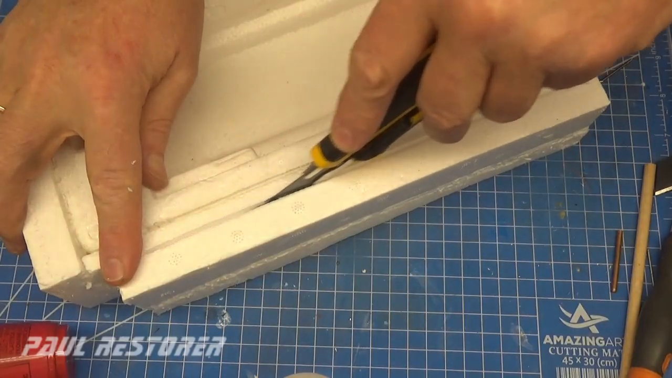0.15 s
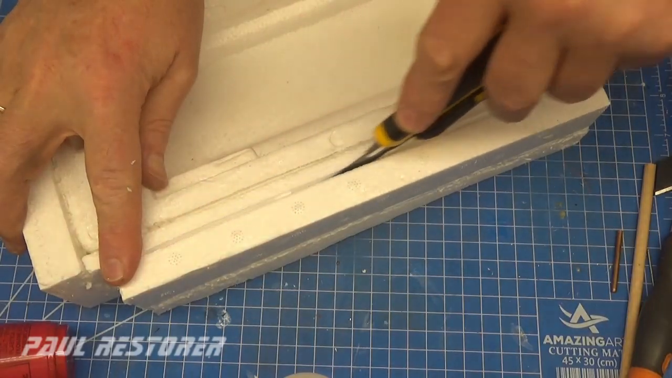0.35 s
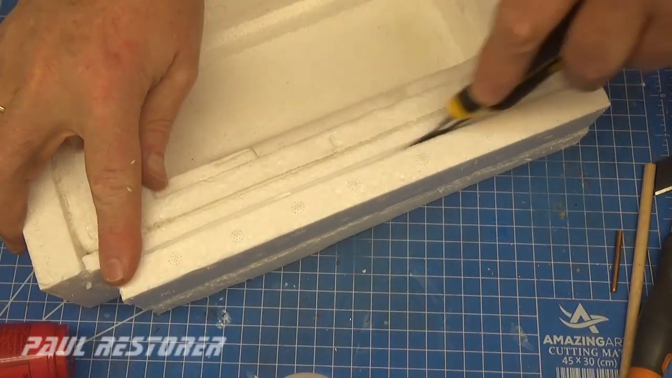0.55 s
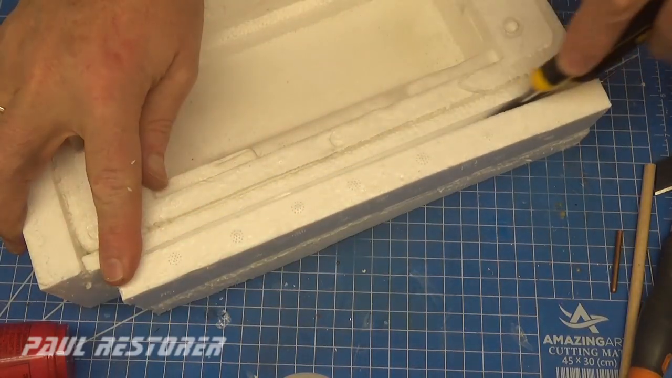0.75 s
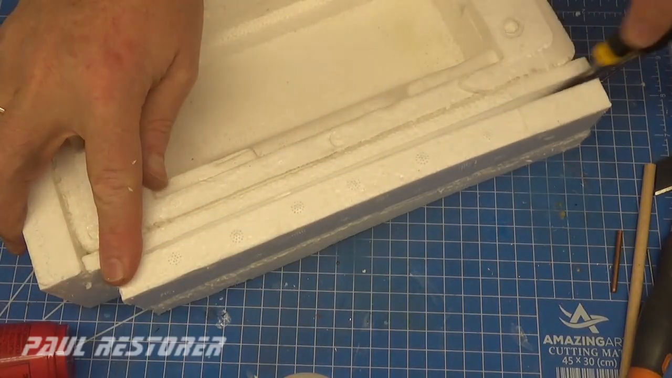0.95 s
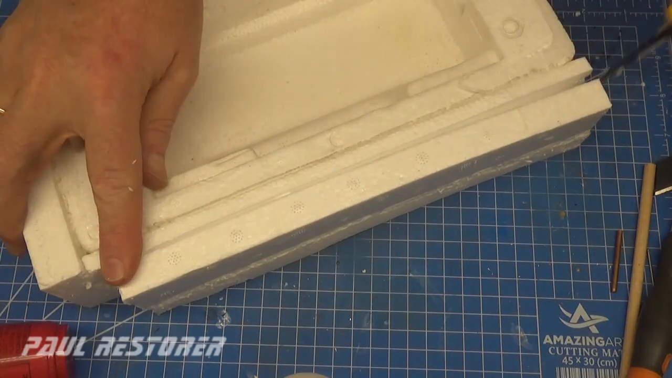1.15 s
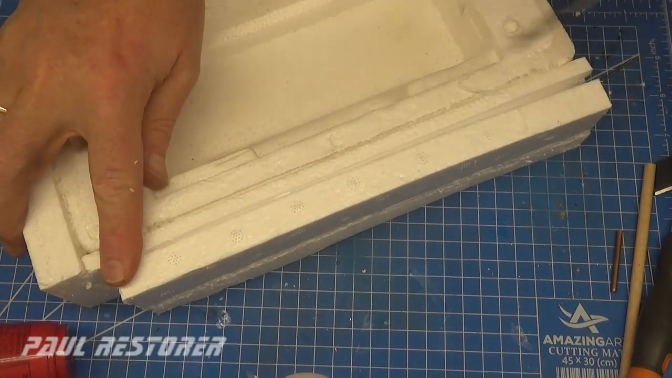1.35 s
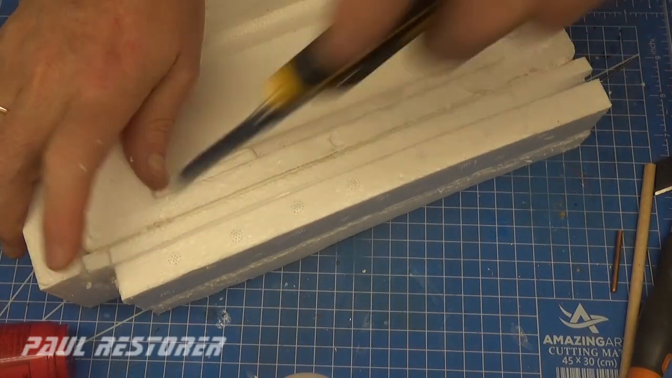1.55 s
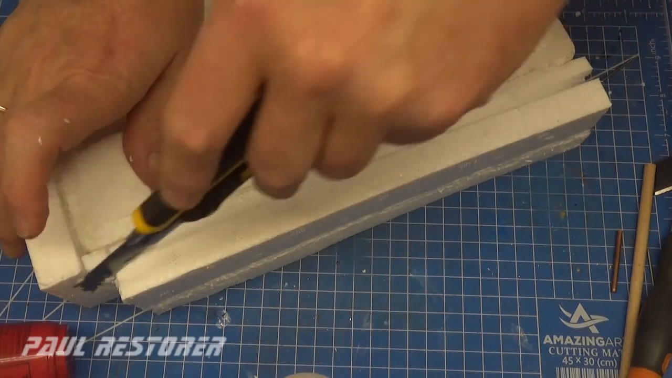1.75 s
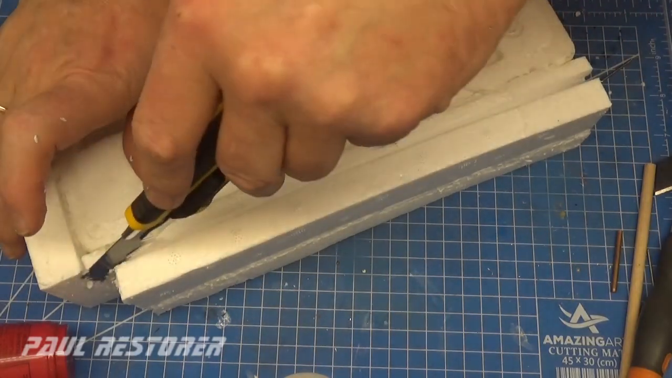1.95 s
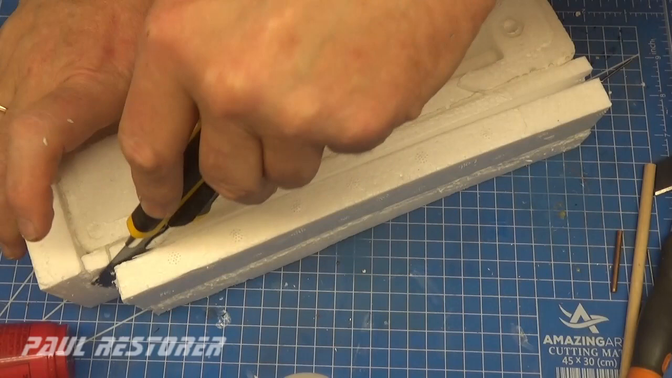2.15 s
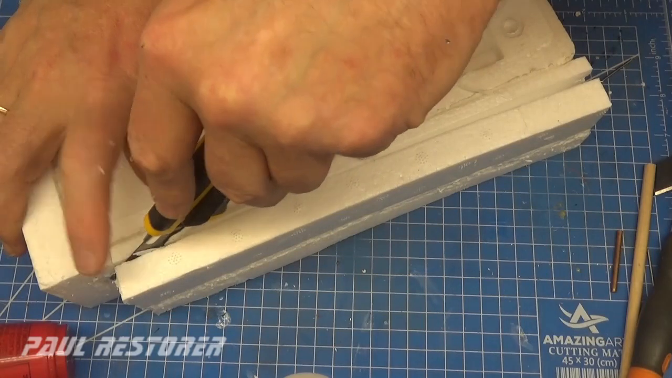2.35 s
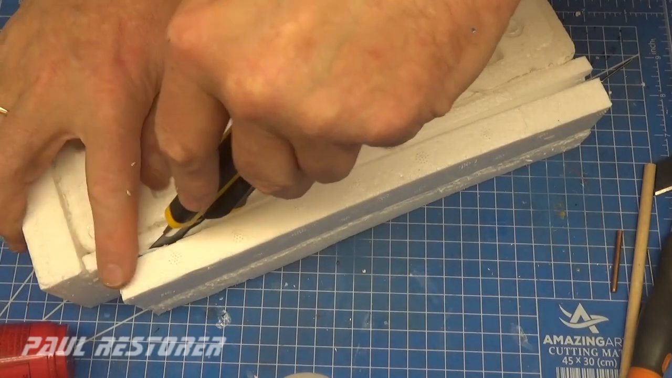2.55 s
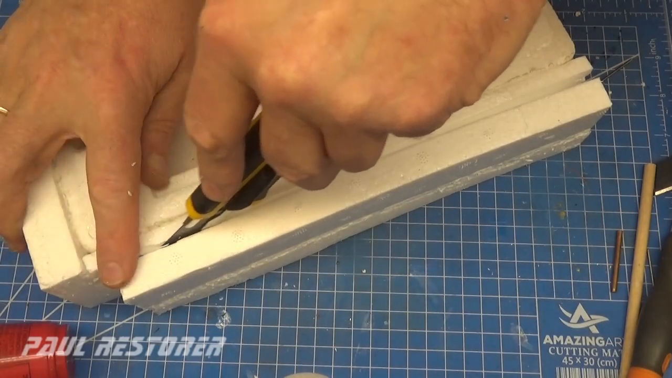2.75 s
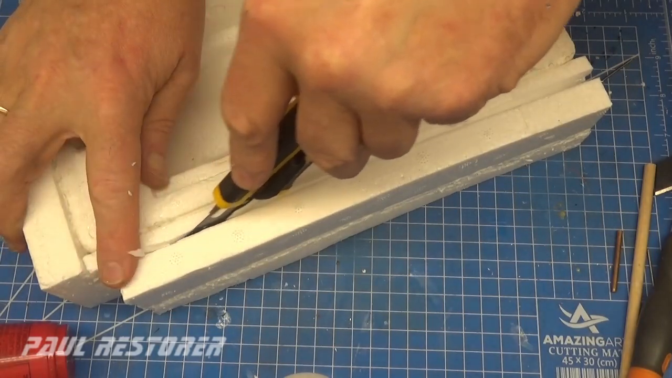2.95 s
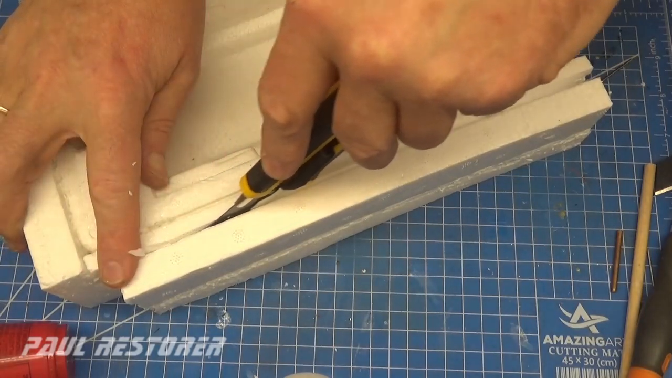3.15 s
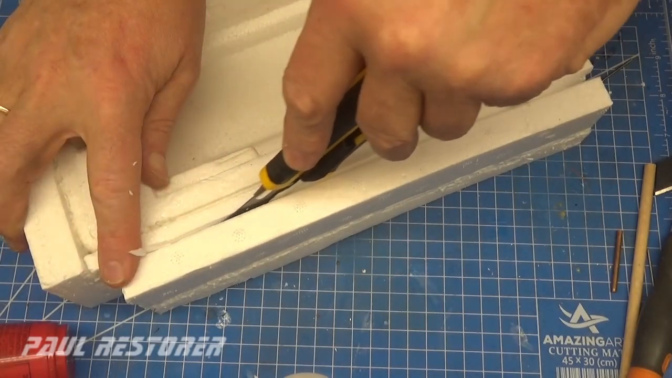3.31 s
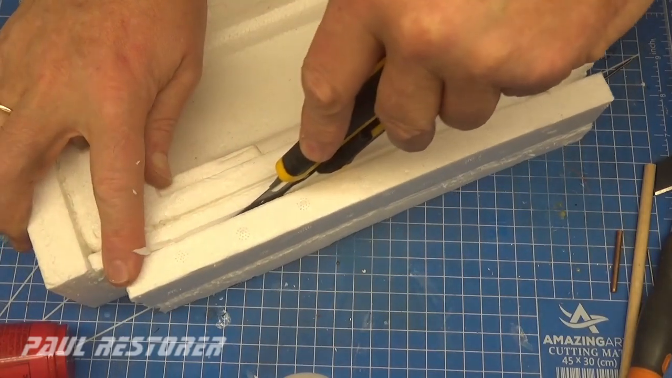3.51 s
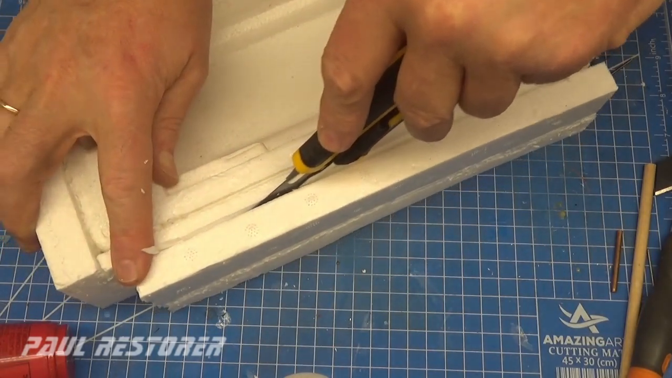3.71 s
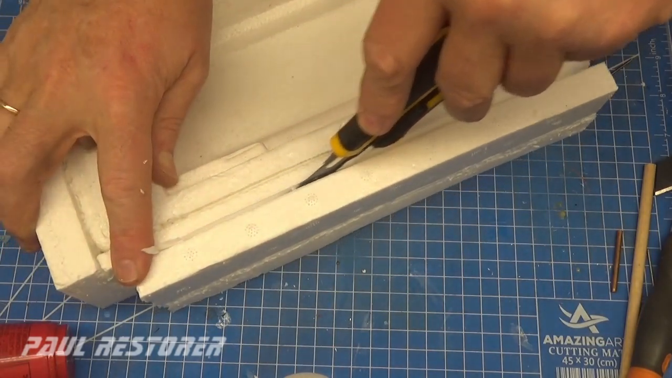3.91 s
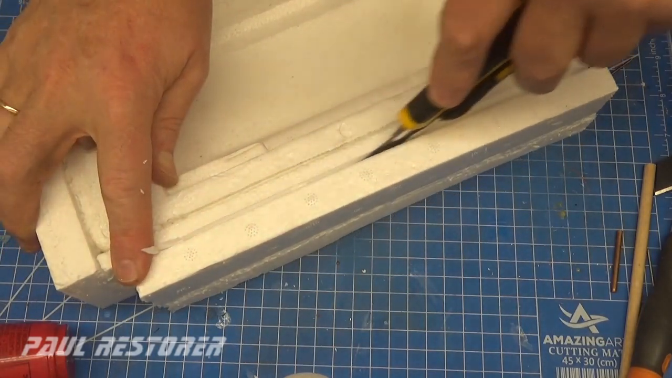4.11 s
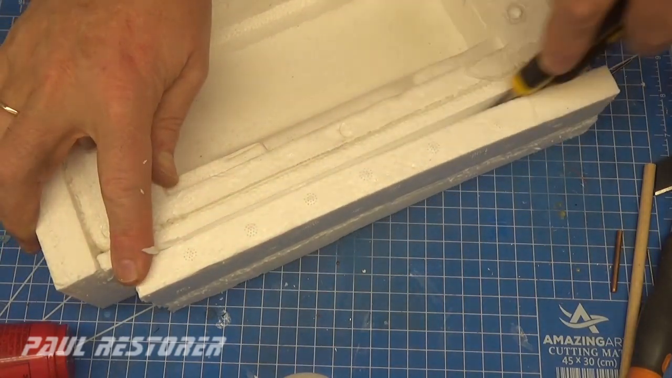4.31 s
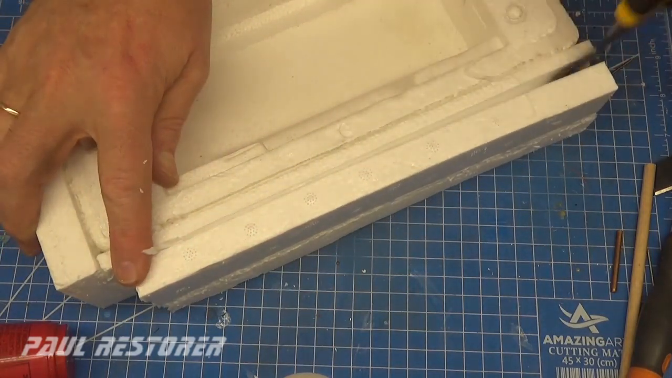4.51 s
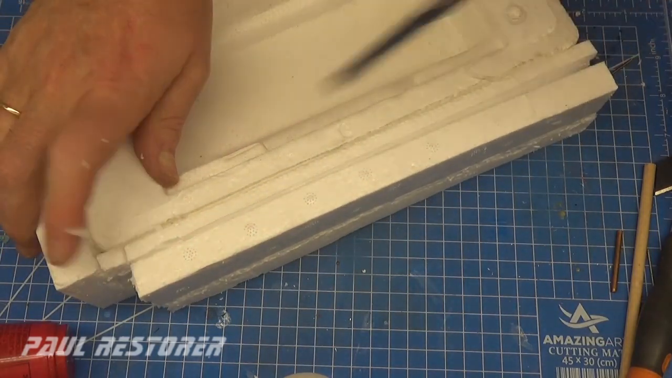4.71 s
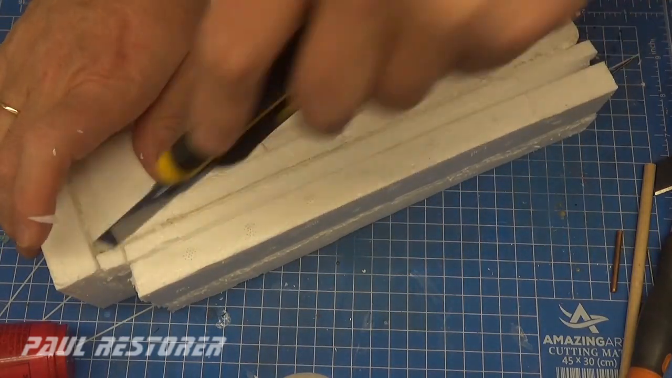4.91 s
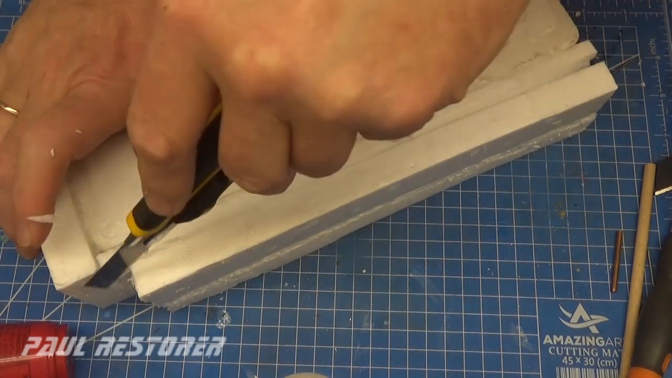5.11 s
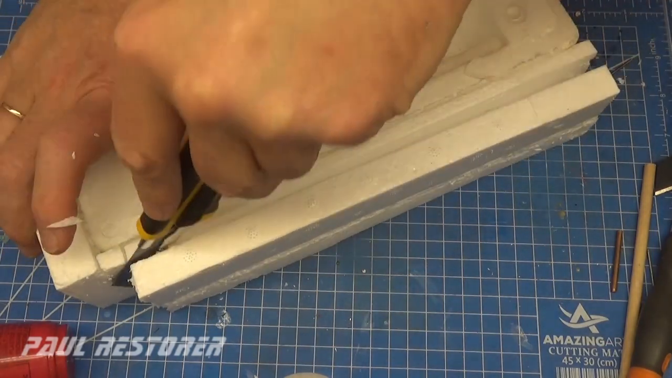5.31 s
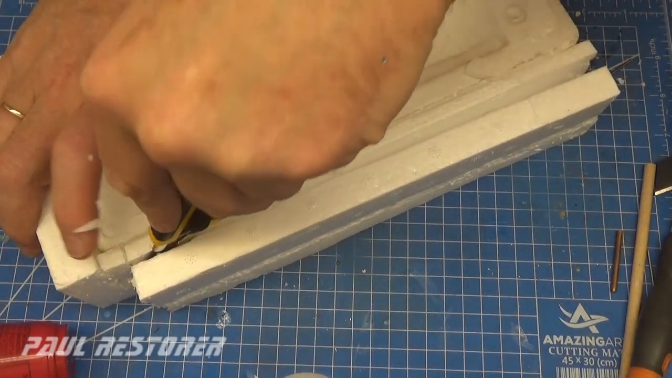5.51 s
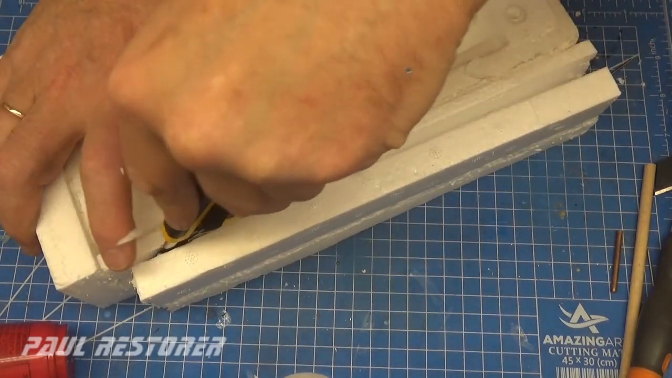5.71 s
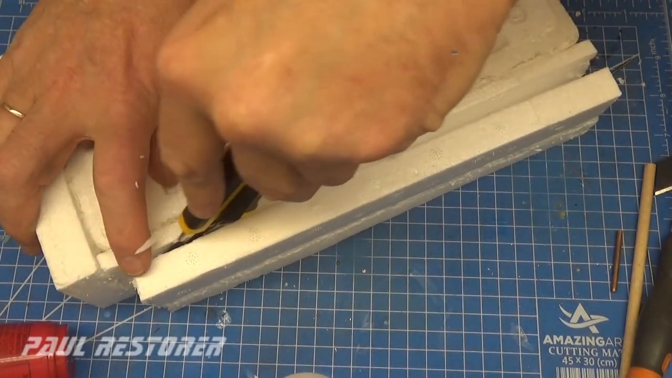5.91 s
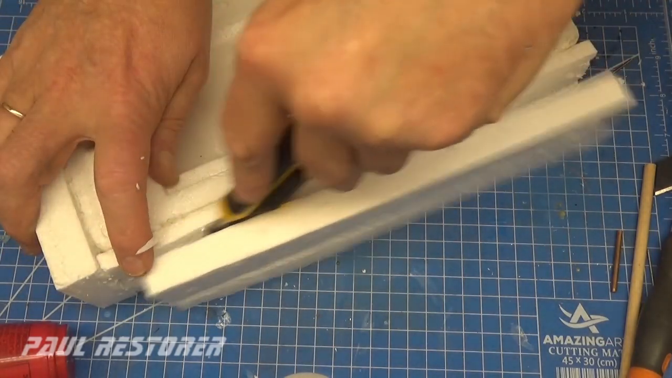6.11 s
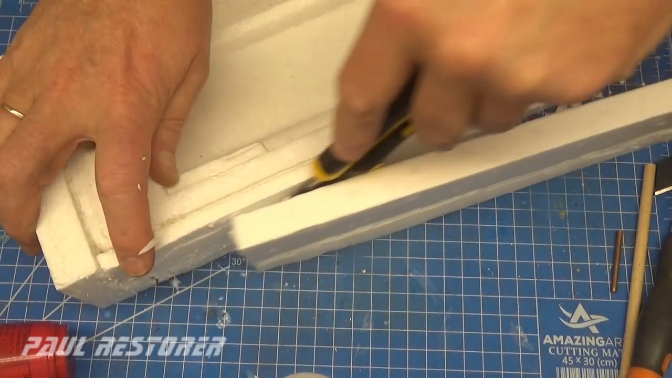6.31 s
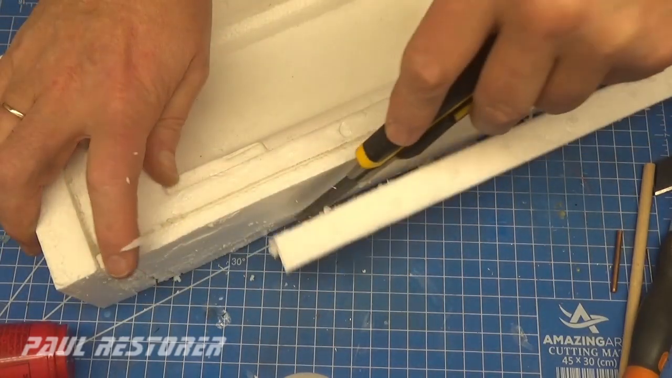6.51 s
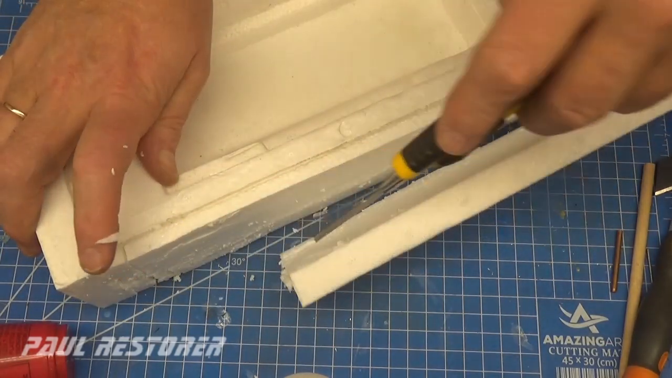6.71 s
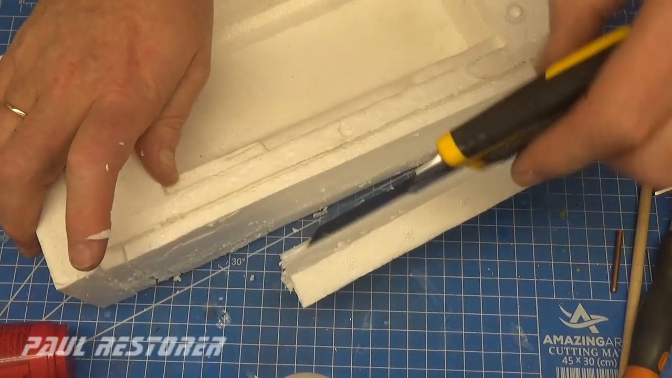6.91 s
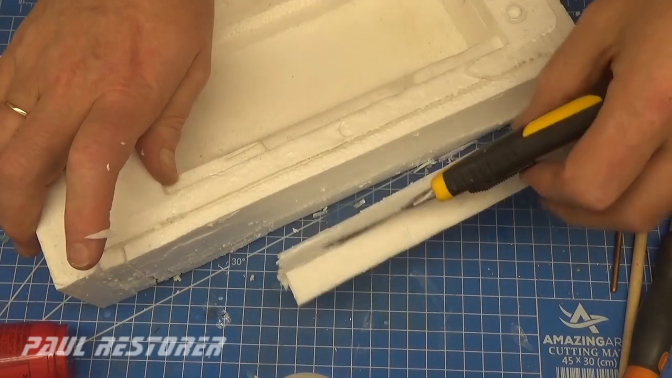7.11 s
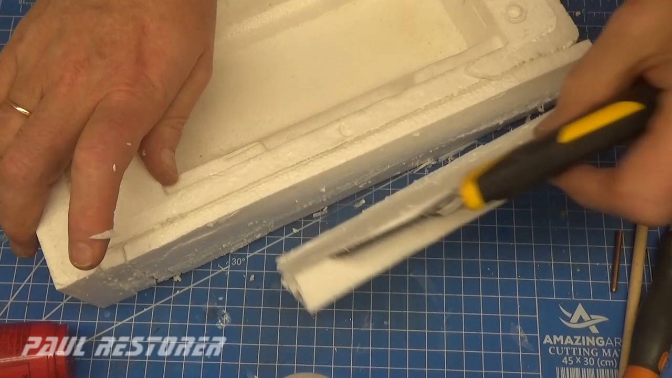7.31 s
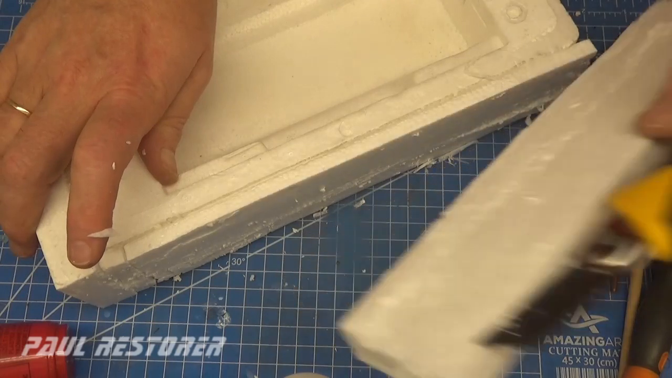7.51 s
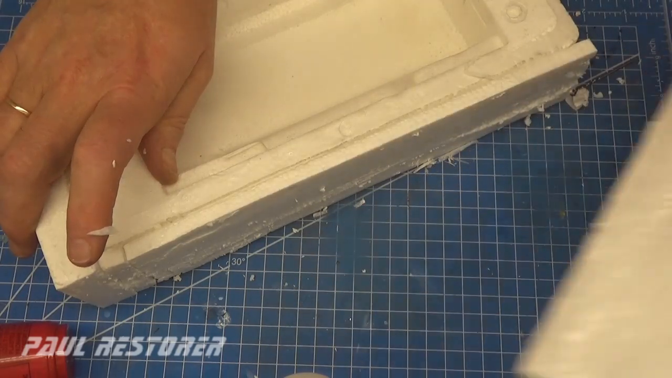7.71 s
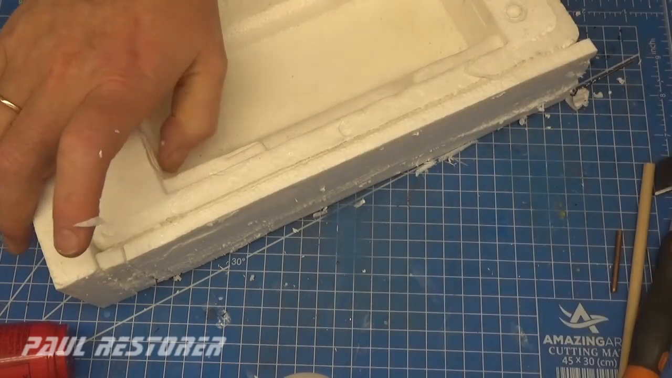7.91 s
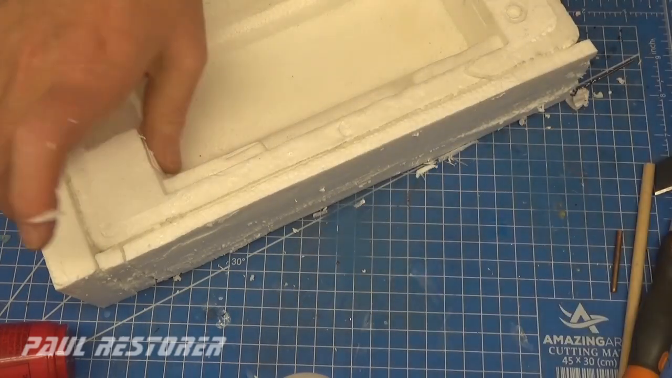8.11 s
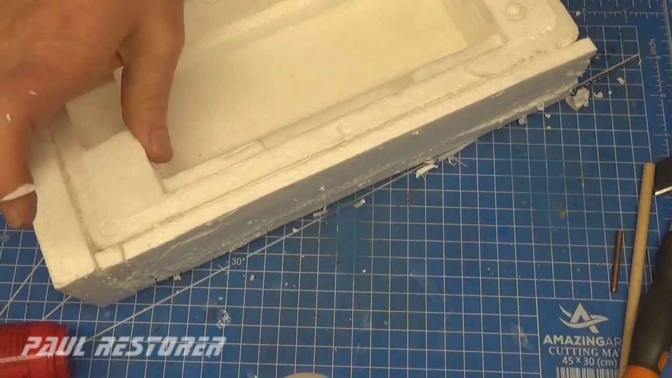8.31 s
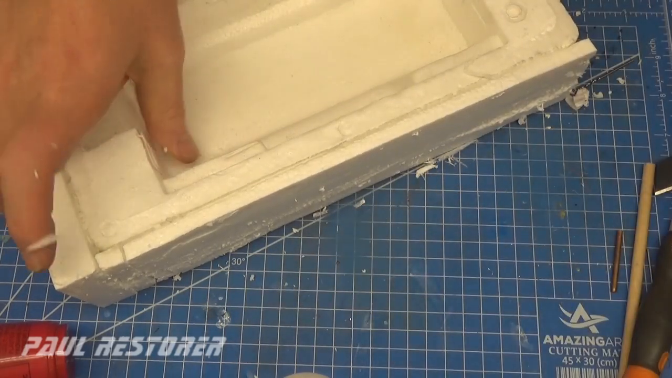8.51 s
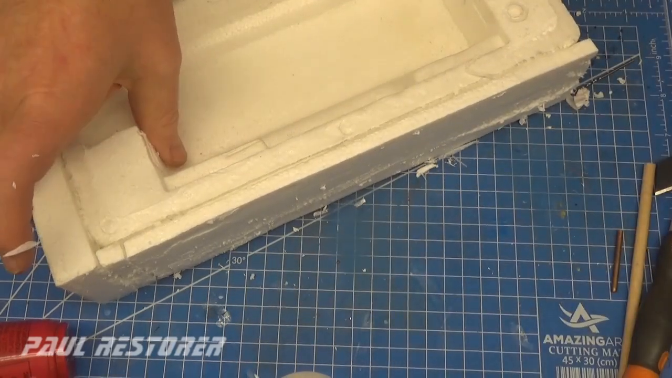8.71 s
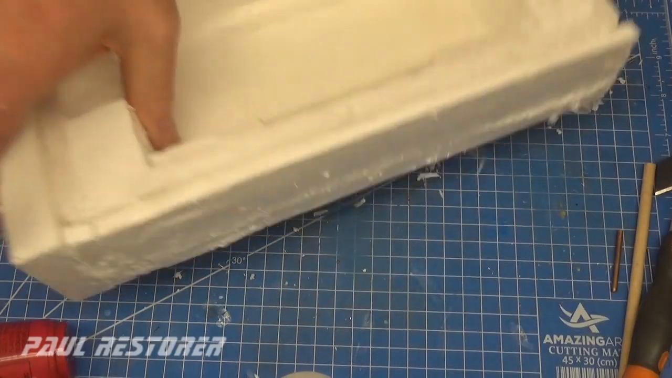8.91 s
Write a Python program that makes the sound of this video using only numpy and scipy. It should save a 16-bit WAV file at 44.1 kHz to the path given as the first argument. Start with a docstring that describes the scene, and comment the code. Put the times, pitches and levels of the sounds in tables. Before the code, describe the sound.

Very close in a small quiet room, a craft knife is pulled through a polystyrene slab three times. Each stroke is a bright, gritty crunch with sharp bead pops, and thin squeaks come where the blade binds. Light touches fill the gaps. The freed strip drops with a dull hollow knock and is scraped aside, then a hand rubs the foam in soft hisses and the slab lands with a low bump.

```python
"""A crisp crunch with brief squeaks: a craft knife is drawn three times along a slab of bead polystyrene
on a cutting mat, close by in a small room. Random fractures filtered by the foam make the crunch, noise
bursts make the popping beads, and gliding stick-slip tones make the squeaks of the binding blade. The freed
strip drops in damped modes and is pushed away with a rumble; then a hand rubs over the slab, heard as
hiss and rasp, and sets it down with a hollow bump."""
import sys
import numpy as np
from scipy import signal
from scipy.fft import rfft, irfft
from scipy.io import wavfile

SR = 44100
rng = np.random.default_rng(int(sys.argv[2]) if len(sys.argv) > 2 else 0)


def digitize_waveform(pressure):
    """Quantize a signal to 16-bit integers and store it at the path in sys.argv[1].

    Rows of a 2-D input are taken as channels; values are limited to [-1, 1].
    """
    field = np.atleast_2d(pressure).T
    bounded = np.clip(field, -1, 1)
    quanta = np.round(bounded * 32767).astype(np.int16)
    wavfile.write(sys.argv[1], SR, quanta)


N = 394676
T = np.arange(N) / SR  # time in s

# Three draws of the blade along the slab, each a list of rows.
# Each row: time in seconds, relative levels of cell crackle, bead crunch and slab rumble in dB.
DRAW_LEVELS = [
    [(0.0, -38, -47, -62), (0.24, -38.5, -49, -62), (0.56, -34, -44, -49), (0.7, -38, -48.5, -52.5),
     (1.01, -37.5, -44, -49.5), (1.13, -39, -53.5, -64)],
    [(2.35, -48.5, -54, -63), (2.58, -40.5, -53.5, -74), (2.68, -53, -63, -88), (3.05, -45, -51, -65),
     (3.47, -46, -52, -54), (3.82, -41.5, -50.5, -64), (4.2, -36, -43.5, -46.5), (4.37, -38.5, -49.5, -48),
     (4.535, -40, -50.5, -64)],
    [(5.52, -37.5, -49.5, -68), (5.76, -46, -54.5, -56.5), (5.94, -41, -51, -60.5), (6.11, -48, -54, -65),
     (6.17, -33, -53, -71), (6.29, -31, -43.5, -64.5), (6.44, -33.5, -45.5, -57), (6.47, -46, -49.5, -57),
     (6.53, -56, -54, -53.5)],
]
# Spectra of rubbed foam. Each row: frequency in Hz, relative level in dB per Hz.
HISS_SPECTRUM = [(2500, -36), (4800, -20.5), (6500, -4.5), (9500, 3.5), (13500, 0.5), (16000, -3)]
RASP_SPECTRUM = [(150, -29), (420, -12), (900, -13.5), (1150, -16), (1550, -5.5), (2300, -2.5), (3200, -1),
                 (4800, -5.5), (7000, -4.5)]
# Resonances of slab and blade, then bending resonances of a rubbed piece.
# Each row: centre in Hz, width in Hz, boost in dB.
SLAB_AND_BLADE_RESONANCES = [(268, 17, 3.5), (464.3, 29, 4), (495.5, 42, 8.5), (837, 98, 2.5), (912, 31, 7),
                             (1236, 14, 1.5), (1600, 126, 3.5), (2320, 83, 5.5), (3130, 240, 1),
                             (4030, 90, -1), (5020, 250, 1), (8950, 180, 0.5), (10300, 300, 0),
                             (14200, 230, -4)]
BENDING_RESONANCES = [(470, 49, 10.5), (912, 83, 16), (1550, 120, 7), (2300, 98, 3), (3025, 120, 6),
                      (4930, 570, 3.5)]

ROOM_T60_S, ROOM_DB = 0.15, -10.5


def from_db(db):
    """Decibels are logarithmic: 20 dB are a factor of ten in amplitude."""
    return 10 ** (np.asarray(db) / 20)


def rms_one(x):
    """Normalization of signal power: scales to rms 1."""
    return x / np.sqrt(np.mean(x ** 2) + 1e-20)


def drift(rate):
    """Band-limited chance: random knots, rate of them a second, joined by straight lines; rms 1."""
    knots = rng.standard_normal(40000)
    return rms_one(np.interp(T * rate, np.arange(len(knots)), knots))


def fade(t, start, end, edge_s):
    """Gating envelope: 1 from start to end, with short linear ramps outside."""
    return np.clip(1 + np.minimum(t - start, end - t) / edge_s, 0, 1)


def around(start, end):
    """Time window: the samples of a stretch, with a margin of 10 ms."""
    return slice(*np.searchsorted(T, [start - .01, end + .01]))


def colour(x, spectrum, resonances=(), size=8192):
    """Causal minimum-phase filtering by a spectrum and resonances; white noise keeps its level."""
    hz = np.maximum(np.arange(size // 2 + 1) * SR / size, 1)
    points, levels = np.transpose(spectrum)
    octaves_outside = np.abs(np.log2(hz / np.clip(hz, points[0], points[-1])))
    db = np.interp(np.log(hz), np.log(points), levels) - 12 * octaves_outside
    for centre, width, boost in resonances:
        db = db + boost / (1 + (2 * (hz - centre) / width) ** 2)
    # folding the cepstrum onto positive times gives the minimum phase
    cepstrum = irfft(np.log(from_db(db)))
    cepstrum[1:size // 2] *= 2
    cepstrum[size // 2 + 1:] = 0
    response = irfft(np.exp(rfft(cepstrum)))
    return signal.oaconvolve(x, response / np.linalg.norm(response))[:N]


def fractures(per_s, size_db, clump_db, clump_rate):
    """Shot noise: tiny breaks of uneven size at random moments, stronger in clumps; rms 1."""
    born = rng.random(N) < per_s / SR
    sizes = from_db(size_db * np.minimum(rng.exponential(1, N), 4))
    signs = rng.choice([-1, 1], N)
    clumps = from_db(clump_db * np.clip(drift(clump_rate), -2, 2))
    return rms_one(born * sizes * signs * clumps)


def blows(times, levels_db, t60, rise_s, lead_db=-17, size=4096):
    """Brittle failure: cells creak as the load builds, then give in a dying burst; dB is rms over 5 ms."""
    lead = size // 8
    out = np.zeros(N + size)
    age = (np.arange(size) - lead) / SR
    attack = from_db(lead_db) + 1 - np.exp(-np.maximum(age, 0) / rise_s)
    shape = from_db(-60 * np.abs(age) / t60) * attack
    for s, db in zip(times, levels_db):
        burst = rng.standard_normal(size) * shape
        at = int(s * SR)
        out[at:at + size] += from_db(db) * burst * np.sqrt(.005 * SR) / np.linalg.norm(burst)
    return out[lead:lead + N]


def foam(cell, bead, slab):
    """Size sets pitch: cell walls sound in the treble, whole beads in the middle, the slab below."""
    # Each row of the three spectra: frequency in Hz, relative level in dB per Hz.
    cell_spectrum = [(3500, -21), (6000, -11.5), (7500, -4), (9500, 1.5), (11300, -2), (13000, 2.5),
                     (15000, 2.5), (16000, -18)]
    bead_spectrum = [(500, -29), (1000, -19.5), (1600, -3), (2400, -0.5), (3500, -1.5), (5200, 2),
                     (7000, -2), (10000, -10.5)]
    slab_spectrum = [(30, -47), (70, -0.5), (180, -8), (270, 1.5), (480, -0.5), (620, -2), (900, 2),
                     (1400, -2), (2500, -16)]
    treble = colour(cell, cell_spectrum, SLAB_AND_BLADE_RESONANCES)
    middle = colour(bead, bead_spectrum, SLAB_AND_BLADE_RESONANCES)
    bass = colour(slab, slab_spectrum, SLAB_AND_BLADE_RESONANCES)
    return treble + middle + bass


def swell(peak_s, length):
    """Force envelope of one push of the hand: its stretch of time, and its gain with a rounded peak."""
    # share of the length before the peak, fall at its two ends, roundness of the top
    rise_share, fall_db, roundness = 0.55, 10, 1.34
    near = around(peak_s - 2 * length, peak_s + 2 * length)
    age = T[near] - peak_s
    away = np.maximum(-age / rise_share, age / (1 - rise_share)) / length
    return near, from_db(-fall_db * away ** roundness)


def swells(rows):
    """Power addition of overlapping pushes: one gain curve for each dB column of a table."""
    out = np.zeros((len(rows[0]) - 2, N))
    for peak_s, length, *levels_db in rows:
        near, gain = swell(peak_s, length)
        out[:, near] = np.hypot(out[:, near], from_db(levels_db)[:, None] * gain)
    return out


def shifting(x, depth_db, rate, echo_db=-9.0, paths_s=(.0011, .0024), travel=.16, count=16):
    """Comb interference: a moving contact favours changing bands, and echoes from the edges sweep a comb."""
    out = x
    for hz in np.geomspace(350, 14000, count):
        band = signal.lfilter(*signal.iirpeak(hz, 4, fs=SR), x)
        gain = rms_one(from_db(depth_db * drift(rate)))
        out = out + band * (gain - 1)
    lags = [np.round(path * SR * (1 + travel * drift(7))).astype(int) for path in paths_s]
    echoes = sum(out[np.clip(np.arange(N) - lag, 0, N - 1)] for lag in lags)
    # the echoes return inverted; the divisor makes up for their power
    return (out - from_db(echo_db) * echoes) / np.sqrt(1 + len(lags) * from_db(echo_db) ** 2)


def ringing(hits, modes):
    """Modal decay: foam that lands flat rings like a dull drum, in damped modes of alternating sign."""
    out = np.zeros(N)
    for s, db in hits:
        after = around(s, s + .4)
        age = np.maximum(T[after] - s, 0)
        for k, (hz, level, t60) in enumerate(modes):
            envelope = from_db(db + level - 60 * age / t60)
            out[after] += (-1) ** k * envelope * np.sin(2 * np.pi * hz * age)
    return out


def room(x, t60, gap_s, size=16384):
    """Diffuse reverberation: reflections start after a short gap and die away; unit gain."""
    age = np.arange(size) / SR
    tail = rng.standard_normal(size) * from_db(-60 * age / t60) * (age > gap_s)
    return signal.oaconvolve(x, tail / np.linalg.norm(tail))[:N]


def room_hush():
    """Steady background noise: two independent coloured noises, for the middle and the side."""
    # Each row: frequency in Hz, relative level in dB per Hz.
    hush_spectrum = [(21, -23), (35, -12), (103, -15.5), (216, -16.5), (286, -12.5), (410, -19.5),
                     (617, -20.5), (758, -18.5), (819, -22), (1810, -29.5), (11500, -38.5), (16000, -31.5)]
    return [from_db(-68.5) * colour(noise, hush_spectrum) for noise in rng.standard_normal((2, N))]


def crumbs():
    """Sparse impulses: loose crumbs tick faintly under the hands."""
    # level of the loudest (rms over 5 ms), and the spread below it
    per_s, loudest_db, spread_db = 8, -58, 17
    sizes = from_db(loudest_db - spread_db * rng.random(N))
    ticks = (rng.random(N) < per_s / SR) * sizes * np.sqrt(.005 * SR)
    grain = colour(ticks, RASP_SPECTRUM, BENDING_RESONANCES)
    return room(colour(ticks, HISS_SPECTRUM) + from_db(-3.5) * grain, t60=0.016, gap_s=0)


def dragging():
    """Frictional judder: foam pushed sideways over the mat rumbles low."""
    # Each row: start in seconds, length in seconds, level in dB.
    drags = [(1.008, 0.025, -52.5), (4.227, 0.015, -49.5), (4.456, 0.11, -63), (5.534, 0.017, -52.5),
             (6.375, 0.018, -53), (6.441, .06, -53.5), (7.169, 0.026, -56), (7.21, 0.022, -63),
             (8.774, 0.042, -53)]
    # Each row: frequency in Hz, relative level in dB per Hz.
    rumble_spectrum = [(45, -12), (85, 2.5), (130, -0.5), (200, 3.5), (330, 3), (520, -12), (900, -29)]
    push = sum(from_db(db) * fade(T, s, s + length, 0.0029) for s, length, db in drags)
    judder = fractures(per_s=750, size_db=1.0, clump_db=1.0, clump_rate=100)
    return colour(push * judder, rumble_spectrum)


def rubbing():
    """Sliding friction: foam and skin catch on countless small edges, a soft hiss over a grainy rasp."""
    # Each row: peak in seconds, length in seconds, relative levels of hiss and rasp in dB.
    rubs = [(1.467, 0.021, -47, -56.5), (6.68, 0.054, -41, -51), (6.755, 0.11, -55.5, -60),
            (7.0, 0.24, -69, -71), (7.16, 0.038, -43.5, -52.5), (7.215, 0.017, -33.5, -43),
            (7.26, 0.15, -48, -58), (7.41, 0.062, -60, -66), (7.62, 0.9, -72, -83),
            (7.92, 0.12, -44.5, -52), (8.06, 0.075, -53, -53.5), (8.12, 0.044, -42, -41),
            (8.23, 0.093, -40, -47), (8.5, 0.078, -40.5, -51.5), (8.805, 0.053, -42.5, -47.5)]
    hiss, rasp = swells(rubs)
    hiss = hiss * from_db(-1.5) * fractures(per_s=8900, size_db=0.5, clump_db=3.5, clump_rate=340)
    rasp = rasp * from_db(1.5) * fractures(per_s=3000, size_db=2.5, clump_db=1.5, clump_rate=140)
    soft = colour(hiss, HISS_SPECTRUM, SLAB_AND_BLADE_RESONANCES)
    grainy = colour(rasp, RASP_SPECTRUM, BENDING_RESONANCES)
    return shifting(soft + grainy, depth_db=3.0, rate=18)


def strip_drops():
    """Modal ringing of a thin bar: the freed strip lands on the mat."""
    # Each row: time in seconds, level in dB.
    drops = [(6.605, -37.5), (7.119, -45), (7.179, -49.5)]
    # Each row: mode frequency in Hz, relative level in dB, 60 dB decay time in seconds.
    strip_modes = [(288.6, -11.5, 0.32), (516, 5.5, 0.057), (744, 5, 0.038), (830, -15, 0.071),
                   (993, -13, 0.29), (1365, -18, 0.34), (1552, -2, 0.053), (1590, -14, .15)]
    return ringing(drops, strip_modes)


def slab_bump():
    """Modal ringing of a hollow body: the slab drops flat and its hollow rings."""
    # Each row: time in seconds, level in dB.
    bumps = [(8.794, -38)]
    # Each row: mode frequency in Hz, relative level in dB, 60 dB decay time in seconds.
    hollow_modes = [(85, -7, 0.095), (190, -15, .06), (325, 1, 0.06), (439, -1.5, 0.28), (690, -12.5, 0.13)]
    return ringing(bumps, hollow_modes)


def knocks():
    """Light impact: knife, fingers and loose strip touch foam and mat and chatter briefly."""
    # Each row: time in seconds, relative levels of cell, bead and slab in dB.
    touches = [(1.2446, -43.5, -53.5, -53.5), (1.2948, -54, -61, -66), (1.4746, -49.5, -50, -57.0),
               (1.511, -54.5, -56.5, -73), (1.6595, -48, -51, -65), (2.1008, -52.5, -55, -77),
               (2.268, -67, -56, -55), (4.5834, -50, -57.5, -68), (4.6097, -45.5, -43, -50),
               (4.646, -41, -48, -55.5), (4.7905, -56.5, -53.5, -57.5), (4.857, -60, -63.5, -79),
               (5.225, -59, -57, -82), (5.2632, -51, -61, -82), (6.5693, -43.5, -51.5, -70),
               (6.6049, -43.5, -47.5, -30), (6.7442, -42.5, -55, -61.5), (7.0475, -55.5, -59.0, -75.0),
               (7.1204, -45.0, -46, -44), (7.1799, -62.0, -54, -47), (7.209, -35, -46, -52),
               (7.804, -45.5, -62, -62), (8.0216, -41.5, -44.5, -47.5), (8.7697, -60, -42.5, -46.5),
               (8.7953, -46, -39, -64)]
    s, cell, bead, slab = np.transpose(touches)
    return foam(blows(s, cell + 0.38, t60=0.02, rise_s=0.00013),
                blows(s, bead + 0.14, t60=0.039, rise_s=0.0001),
                blows(s, slab + 0.1, t60=0.043, rise_s=0.00028))


def slipping(pitch, waver):
    """Stick-slip oscillation: a fast, unsteady slip cycle with overtones below half the sample rate."""
    # Each row: multiple of the slip rate, level in dB.
    overtones = [(1, 3), (2, 1), (3, -10), (4, -3)]
    phase = 2 * np.pi * np.cumsum(pitch * (1 + waver)) / SR
    return sum(from_db(level) * np.sin(round(k) * phase) * (round(k) * pitch < SR / 2)
               for k, level in overtones)


def squeaks(jitter, squeal_roughness, flutter_db):
    """Friction-driven pitch: the slip rate glides as the grip changes; a rougher grip scatters it more."""
    # The blade binds and squeaks, each time in one straight glide.
    # Each row: start in seconds, length in seconds, first slips per second,
    # last slips per second, relative level in dB, roughness as a factor on the jitter.
    gliding_squeaks = [(.010, 0.022, 6700, 5100, -36.5, 0.28), (0.098, .016, 13100, 12500, -34.5, 0.6),
                       (1.125, 0.017, 4200, 3040, -45, 0.9), (2.186, .014, 15000, 12500, -34, 0.4),
                       (2.206, 0.022, 9500, 8700, -32, 0.44), (2.353, .014, 4900, 9000, -38, 0.81),
                       (2.368, 0.018, 3500, 3700, -45, 0.8), (2.382, 0.009, 840, 830, -53, 0.95),
                       (2.41, 0.015, 6000, 8600, -50, .3), (2.615, .03, 2200, 2300, -57.5, 0.46),
                       (2.75, 0.0072, 3300, 3600, -47.5, 0.68), (2.803, 0.016, 14500, 10500, -34, 0.5),
                       (2.994, 0.013, 9100, 9700, -35, 0.27), (3.162, 0.0082, 13700, 11300, -32.5, 0.3),
                       (3.313, 0.015, 3100, 2850, -43, 0.37), (3.362, 0.058, 12700, 15600, -34.5, 0.4),
                       (3.537, 0.024, 14500, 10300, -35.5, 0.4), (3.565, 0.025, 6900, 4900, -43, 0.52),
                       (3.621, 0.04, 5200, 5700, -49, 0.7), (3.69, 0.022, 8500, 15300, -36, 0.25),
                       (5.352, 0.014, 7700, 10300, -34.5, 0.35), (5.44, 0.047, 2600, 3600, -70, 0.5),
                       (5.55, .012, 9600, 9700, -31.5, .4), (5.639, 0.033, 2600, 3700, -56, 1.1),
                       (6.167, 0.24, 5300, 5850, -40.5, 1.11), (6.182, 0.15, 14500, 14500, -41, 0.1),
                       (6.492, 0.024, 1850, 1200, -51.5, 1.22)]
    # One squeal as the blade is forced in; its pitch rises and falls repeatedly.
    # Each row: time in seconds, slips per second, relative level in dB.
    winding_squeal = [(2.467, 9200, -41), (2.478, 4900, -44), (2.514, 3600, -45.5), (2.519, 4260, -35.5),
                      (2.536, 4300, -37), (2.548, 4500, -30), (2.566, 6900, -41.5), (2.591, 3500, -48),
                      (2.616, 3300, -54)]
    out, waver = np.zeros(N), jitter * drift(3000)
    for s, length, first_hz, last_hz, db, roughness in gliding_squeaks:
        near = around(s, s + length)
        pitch = np.interp(T[near], [s, s + length], [first_hz, last_hz])
        tone = slipping(pitch, roughness * waver[near])
        out[near] += from_db(db) * tone * fade(T[near], s, s + length, 0.0055)
    s, hz, db = np.transpose(winding_squeal)
    near = around(s[0], s[-1])
    tone = slipping(np.interp(T[near], s, hz), squeal_roughness * waver[near])
    out[near] += from_db(np.interp(T[near], s, db)) * tone * fade(T[near], s[0], s[-1], 0.0025)
    return out * rms_one(from_db(flutter_db * drift(600)))


def random_pops():
    """Poisson events: further beads pop at random while the blade runs; rows like those of the placed pops."""
    # Usual relative levels of cell, bead and slab in dB.
    usual_db = (-40.5, -49, -56.5)
    per_s, spread_db = 11, 1
    running = sum((T > rows[0][0]) & (T < rows[-1][0]) for rows in DRAW_LEVELS)
    times = T[rng.random(N) < running * per_s / SR]
    levels_db = np.array(usual_db) + spread_db * rng.standard_normal((len(times), 3))
    return np.column_stack([times, levels_db])


def pops():
    """Sudden release of stored strain: a hard bead resists the blade, then bursts at once."""
    # Single bead pops, strong and weak.
    # Each row: time in seconds, relative levels of cell, bead and slab in dB.
    placed_pops = [(0.2888, -34, -45, -57), (0.5861, -33, -36.5, -41.5), (0.8382, -35, -38, -45.5),
                   (0.8885, -35, -37.5, -68), (0.9091, -40, -41, -48.5), (0.9272, -31, -39, -53),
                   (0.9988, -29, -43, -50), (1.0803, -28, -53, -57), (2.1518, -38, -57, -62),
                   (2.751, -31, -43, -57.5), (3.539, -35, -70, -68), (5.509, -31.5, -47, -61),
                   (3.1866, -54, -43, -48.5), (3.282, -38, -41, -44), (3.3571, -35, -39.5, -47.5),
                   (4.007, -33, -41, -52), (4.3211, -37, -40.5, -36.5), (4.4731, -28, -52, -61),
                   (5.6876, -32.5, -45.5, -60), (5.799, -40, -48, -49.5), (5.819, -45, -49, -56),
                   (6.007, -49, -51, -54), (6.0583, -34.5, -49, -53)]
    s, cell, bead, slab = np.vstack([placed_pops, random_pops()]).T
    return foam(blows(s, cell - 1.5, t60=0.009, rise_s=0.00014),
                blows(s, bead - .5, t60=0.012, rise_s=0.0001),
                blows(s, slab + .5, t60=0.014, rise_s=0.00038))


def drawing():
    """Exponential onset and decay: gains of cells, beads and slab as the blade bites, runs and exits."""
    # it bites quickly, and the crunch dies away once it is through
    bite_db_per_s, exit_db_per_s = 2200, 650
    out = np.zeros((3, N))
    for rows in DRAW_LEVELS:
        s, *levels_db = np.transpose(rows)
        near = around(s[0] - .1, s[-1] + .2)
        t = T[near]
        ends_db = bite_db_per_s * np.maximum(s[0] - t, 0) + exit_db_per_s * np.maximum(t - s[-1], 0)
        out[:, near] += from_db([np.interp(t, s, db) - ends_db for db in levels_db])
    return out


def cutting():
    """Fracture noise: the blade breaks thousands of cells a second and surges from bead to bead."""
    # The blade is shoved in or forced past a tight spot.
    # Each row: peak in seconds, length in seconds, relative levels of cell, bead and slab in dB.
    shoves = [(0.015, 0.037, -34.5, -42, -46.5), (0.305, 0.048, -36, -42.5, -48),
              (1.135, 0.027, -52, -46, -52), (2.0, 0.049, -55.5, -71, -83),
              (2.07, 0.069, -58.5, -63.5, -64), (2.159, 0.028, -41, -57, -68),
              (2.208, 0.079, -37.5, -52.5, -58.5), (2.356, 0.042, -40, -42.5, -63),
              (2.53, 0.1, -34, -61, -77), (2.745, 0.043, -40, -46, -59), (2.805, 0.066, -41, -74, -80),
              (2.865, 0.056, -34, -44, -69), (3.125, 0.061, -59, -54, -51), (3.385, 0.049, -44, -63, -65),
              (3.565, 0.036, -38, -66, -61), (3.645, 0.23, -39, -44, -50), (4.0, 0.027, -42, -44, -58),
              (4.222, .04, -36, -43, -59), (4.435, 0.043, -32.5, -40.5, -45), (5.333, 0.022, -39, -59, -68),
              (5.358, 0.044, -39, -53, -61), (5.41, .14, -64, -61.5, -66), (5.54, 0.048, -31.5, -44, -49.5),
              (5.645, 0.057, -31, -44.5, -68), (6.165, 0.068, -38, -41.5, -48)]
    # the hand wavers a little during a draw
    waver = from_db(0.16 * drift(59))
    cell, bead, slab = np.hypot(drawing() * waver, swells(shoves))
    surge = rms_one(from_db(1.52 * drift(110)))
    cell = cell * from_db(-1.4) * fractures(per_s=26000, size_db=0.5, clump_db=1.2, clump_rate=1100)
    bead = bead * from_db(-1.16) * fractures(per_s=11000, size_db=-0.2, clump_db=-0.25, clump_rate=450)
    slab = slab * from_db(-2.5) * fractures(per_s=1500, size_db=2.0, clump_db=2.0, clump_rate=70)
    return shifting(foam(cell * surge, bead * surge, slab * surge), depth_db=1.5, rate=28)


def scene():
    """Mid-side superposition: the work is straight ahead; echoes from table and room widen it a little."""
    # Spread of the sound. Each row: frequency in Hz, relative side level in dB.
    side_spectrum = [(60, -8.5), (250, 2.5), (500, 0), (1000, 6.5), (2100, -26), (4600, -8), (8000, 3.5),
                     (14000, -2.5)]
    blade = cutting() + pops() + squeaks(jitter=0.1374, squeal_roughness=0.27, flutter_db=2.5)
    handling = knocks() + slab_bump() + strip_drops() + rubbing() + dragging()
    direct = blade + handling + crumbs()
    hush, hush_side = room_hush()
    mid = direct + from_db(ROOM_DB) * room(direct, ROOM_T60_S, gap_s=0.0043) + hush
    table_echo = from_db(-21.5) * room(direct, t60=0.011, gap_s=0.0001)
    room_echo = from_db(-27.0) * room(direct, ROOM_T60_S, gap_s=0.0013)
    side = colour(table_echo + room_echo + from_db(-10.5) * hush_side, side_spectrum)
    # the first channel is raised slightly and the second lowered
    return np.array([mid + side, mid - side]) * from_db([[.12], [-.12]])


def record(dry):
    """Band limitation: a steep elliptic low-pass cuts the top."""
    cutoff_hz = 15950
    low_pass = signal.ellip(12, .1, 80, cutoff_hz, fs=SR, output="sos")
    return signal.sosfilt(low_pass, dry)


dry = scene()
out = record(dry)
digitize_waveform(out)
```